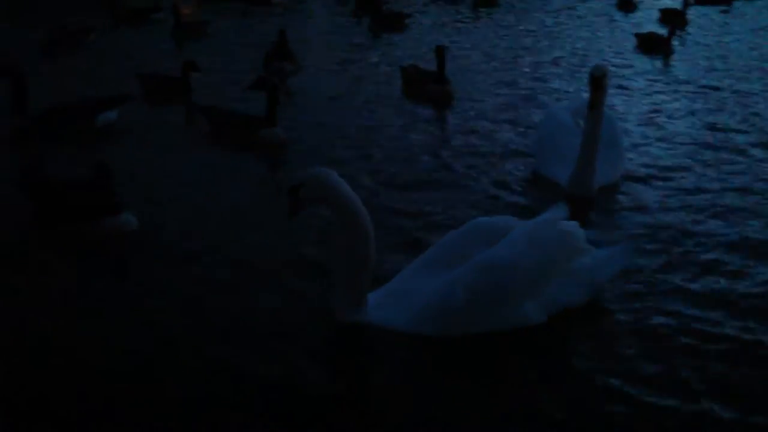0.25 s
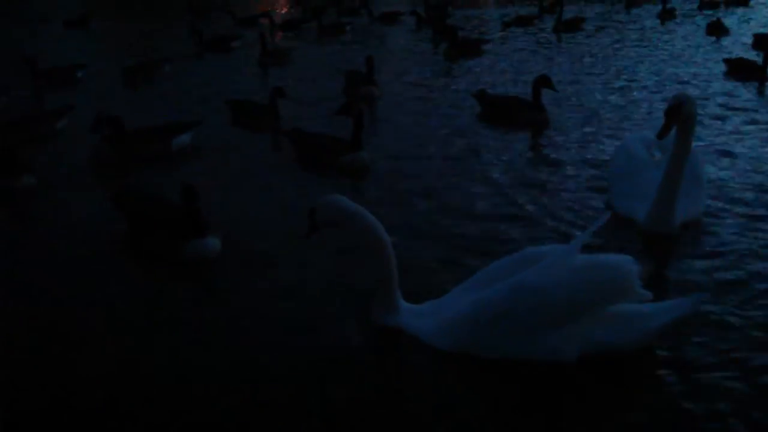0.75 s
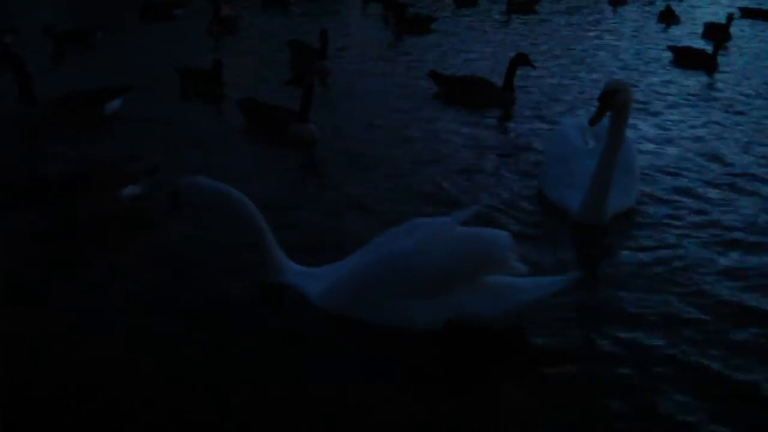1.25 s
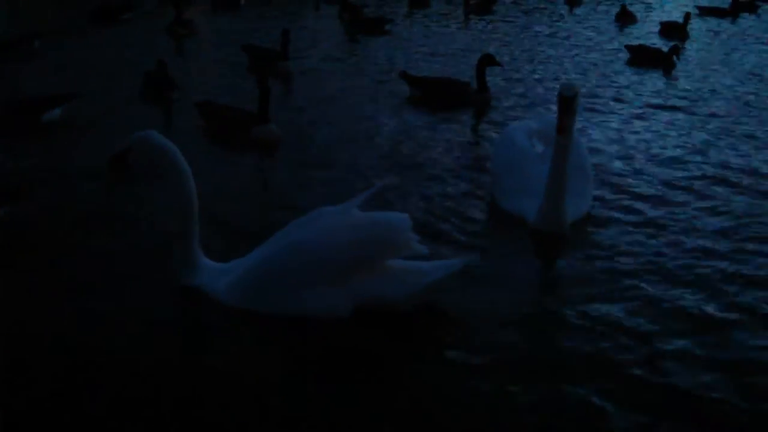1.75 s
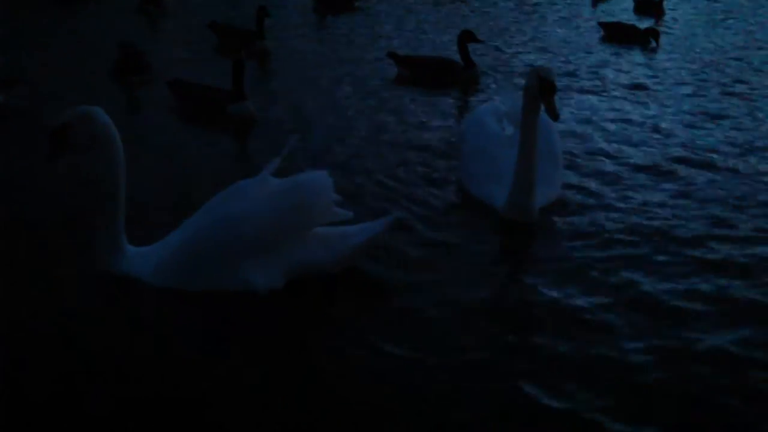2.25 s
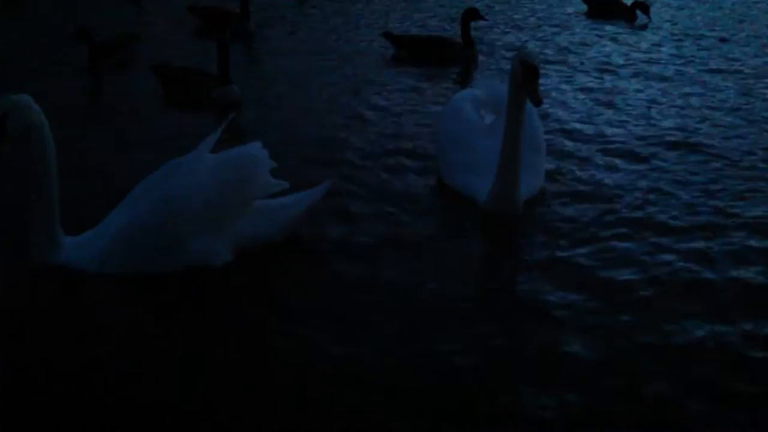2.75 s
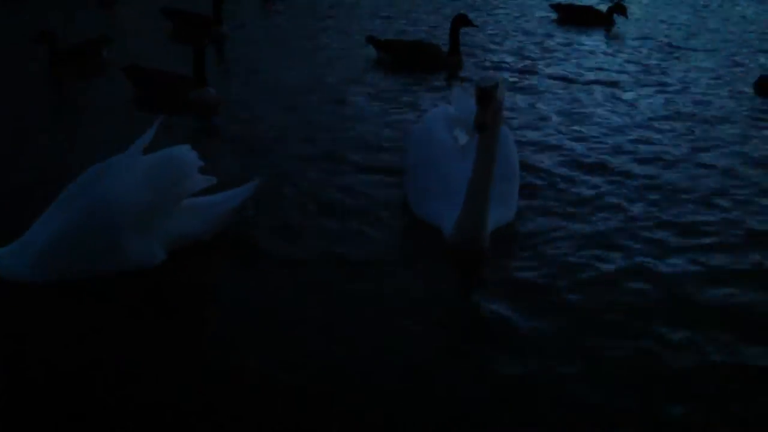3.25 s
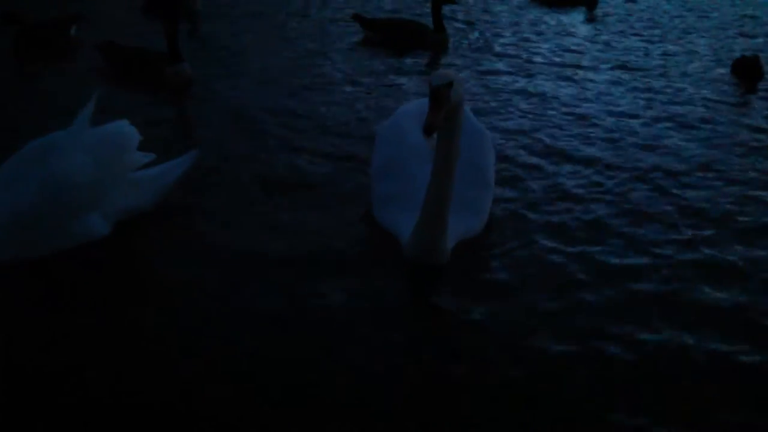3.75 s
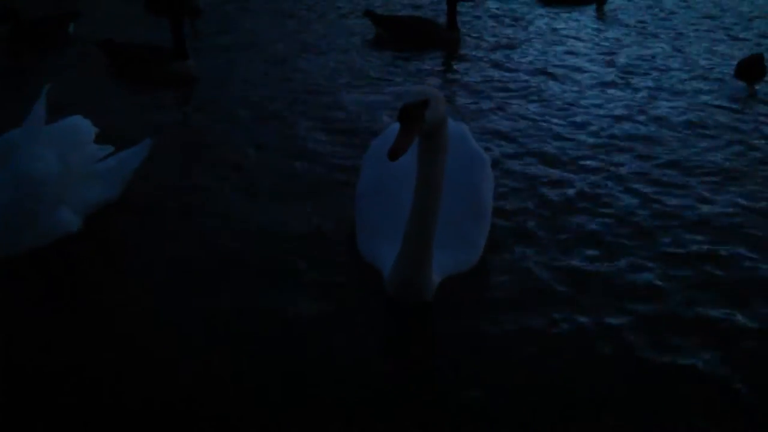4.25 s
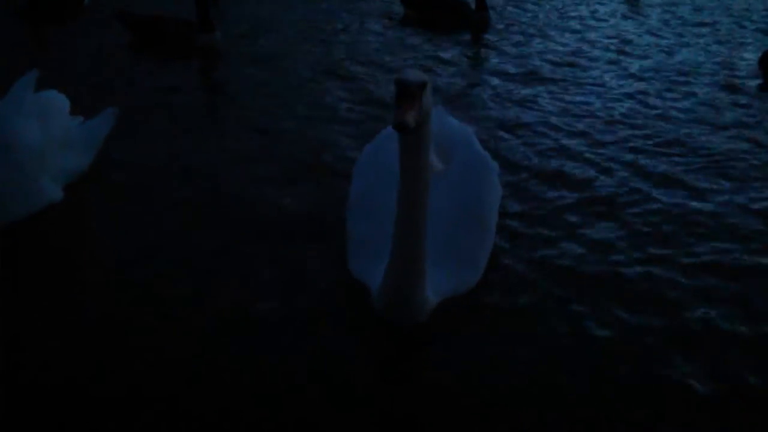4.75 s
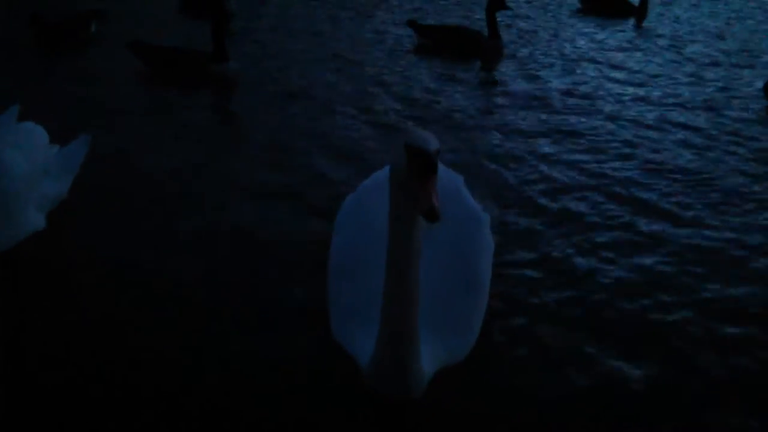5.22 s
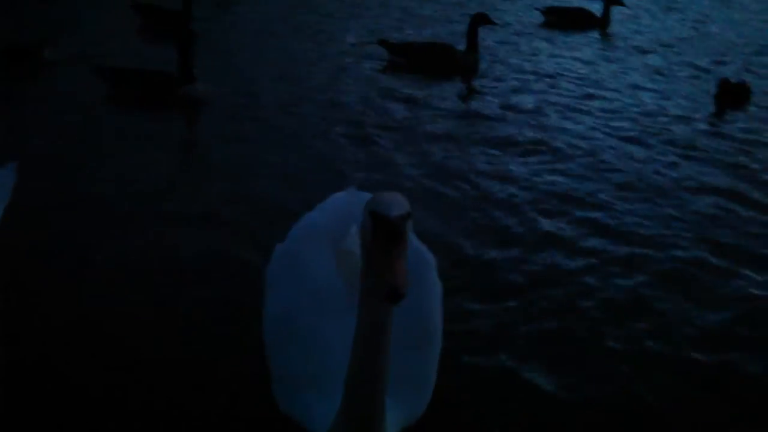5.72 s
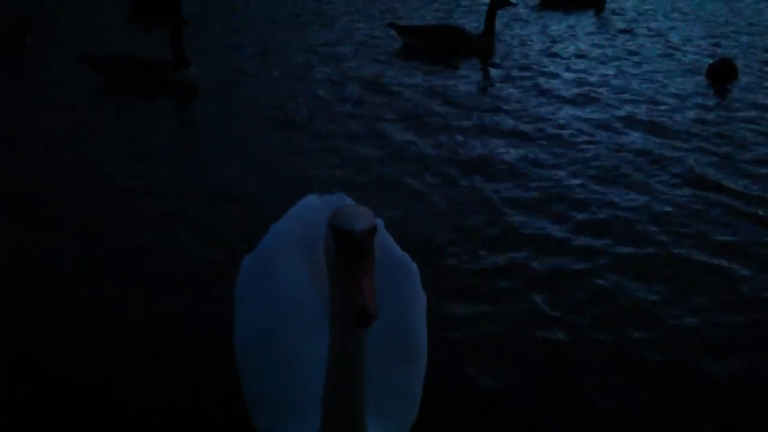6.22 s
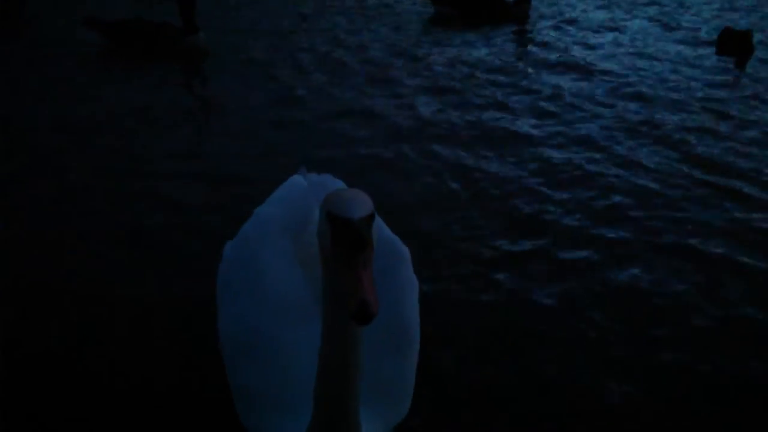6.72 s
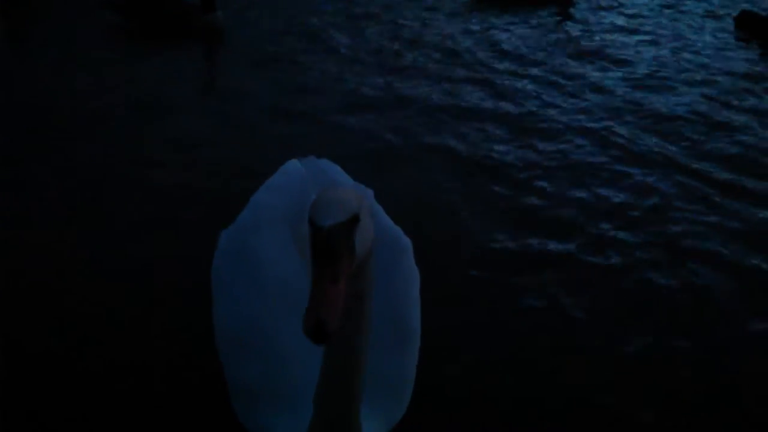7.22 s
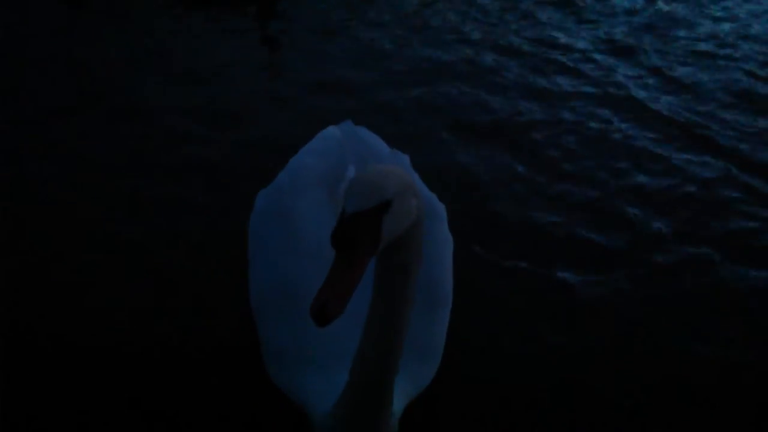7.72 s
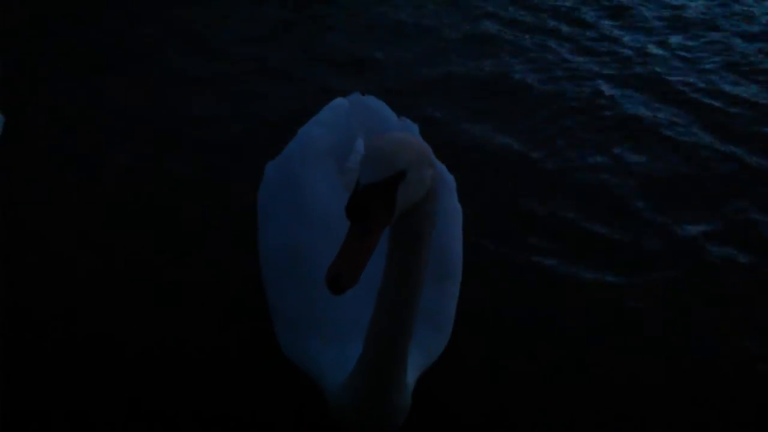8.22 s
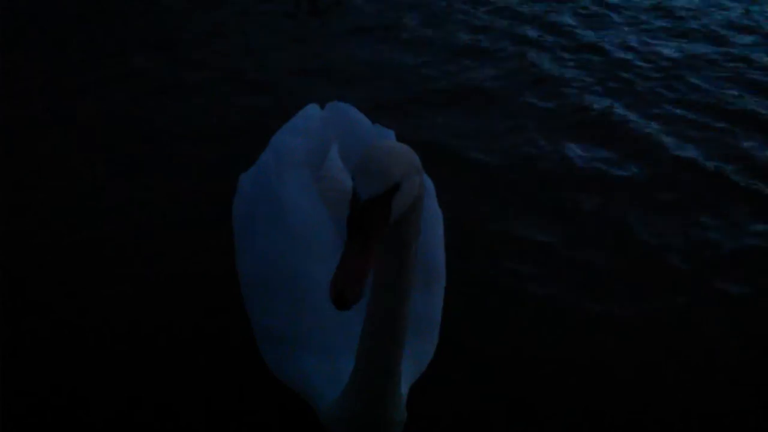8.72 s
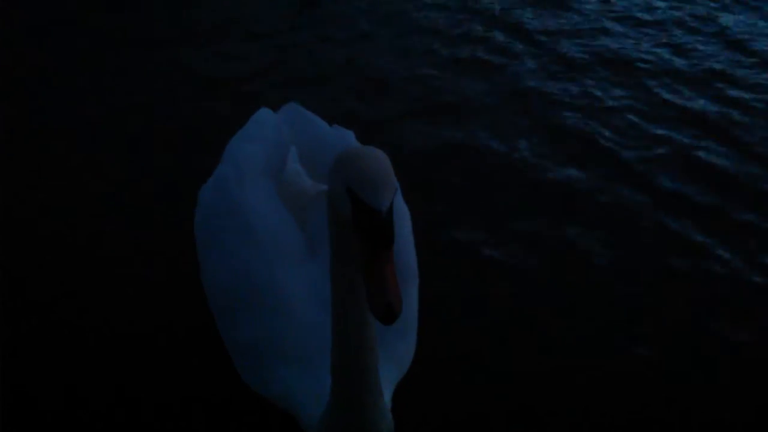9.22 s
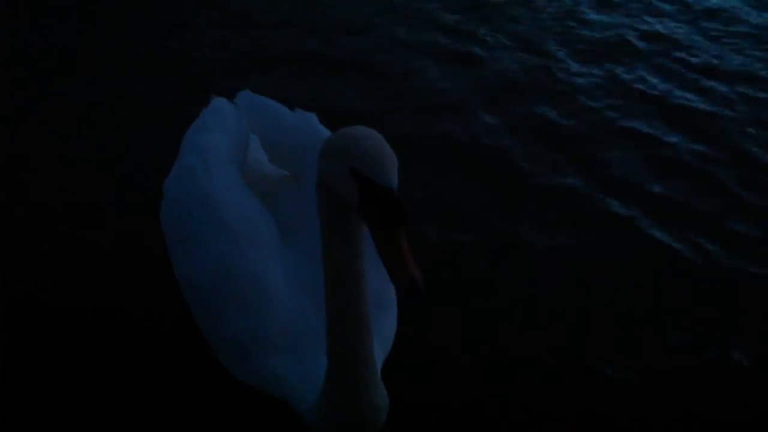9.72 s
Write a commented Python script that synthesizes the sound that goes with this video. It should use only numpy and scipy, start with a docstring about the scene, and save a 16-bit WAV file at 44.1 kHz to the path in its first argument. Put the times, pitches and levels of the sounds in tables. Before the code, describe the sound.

Near geese give creaky, growling honks over a murmuring distant flock on a lake, with paddling, splashes, bill claps and low wind rumble.

```python
"""Geese on a lake at dusk. Near birds honk: a creaky growl breaks into a clear, arched note of whole harmonics.
Farther off a flock murmurs: many short buzzing arches, smeared and half lost in noise, with single calls on top.
Noise bursts paddle, spray and splash, short ticks sound, brief noise contacts ring the bills as claps and a rattle.
Hisses and raspy bursts come and go, a thin wavering sine whistles late; low lumpy noise is wind on the microphone.
Dull echoes return from the banks, bright ones from a hard wall."""
import sys
import numpy as np
from scipy import signal
from scipy.fft import rfft, irfft, next_fast_len
from scipy.io import wavfile
from scipy.ndimage import uniform_filter1d

SR = 44100
rng = np.random.default_rng(int(sys.argv[2]) if len(sys.argv) > 2 else 0)


def int16_out(signal):
    """Quantize to a 16-bit WAV file."""
    q = np.round(np.clip(np.atleast_2d(signal).T, -1, 1) * 32767)
    wavfile.write(sys.argv[1], SR, q.astype(np.int16))


N = 439677


def amp(db):
    """Decibels to gain."""
    return 10 ** (np.asarray(db) / 20)


def rms_one(x):
    """Scale to unit rms."""
    return x / np.sqrt(np.mean(x ** 2) + 1e-20)


def in_time(rows):
    """Columns of a curve, sample by sample."""
    s, *columns = np.transpose(rows)
    return [np.interp(np.arange(N) / SR, s, c) for c in columns]


def span(rows, fade):
    """Sample range of a short curve, a gate with soft ends, and the curve's columns."""
    s, *columns = np.transpose(rows)
    at = np.arange(round((s[0] - fade) * SR), round((s[-1] + fade) * SR))
    t = at / SR
    gate = np.clip(np.minimum(t - t[0], t[-1] - t) / (2 * fade), 0, 1) ** 2
    return at, gate, [np.interp(t, s, c) for c in columns]


def swells(events, rise):
    """Gains of events that rise to a peak and fade; rise is a share of the 20 dB fade time."""
    t, out = np.arange(0, N + 64, 64) / SR, 0
    for s, fade, *levels_db in events:
        away = np.maximum(t - s, (s - t) / rise) / fade
        out = out + amp(np.array(levels_db)[:, None] - 20 * away)
    return [np.interp(np.arange(N) / SR, t, row) for row in out]   # one per level column


def at_hz(points, hz):
    """Read a spectrum on a log-frequency axis, -90 dB outside it."""
    points_hz, points_db = np.array(points).T
    return np.interp(np.log(hz), np.log(points_hz), points_db, left=-90, right=-90)


def drift(rate):
    """Slow chance, spread 1: noise through two equal low-pass stages."""
    r = np.exp(-2 * np.pi * rate / SR)
    return rms_one(signal.lfilter([1], [1, -2 * r, r * r], rng.standard_normal(N + SR))[SR:])


def coloured(x, spectrum, patchy_db=0, rate=10):
    """Give a white signal this spectrum, each third of an octave swelling by itself if patchy; rms 1."""
    size = next_fast_len(N)
    hz = np.maximum(np.arange(size // 2 + 1) * SR / size, 1)
    shaped = rfft(x, size) * amp(at_hz(spectrum, hz))
    if not patchy_db:
        return rms_one(irfft(shaped, size)[:N])
    low, high = (int(3 * np.log2(spectrum[k][0])) for k in (1, -2))
    place = np.clip(3 * np.log2(hz), low, high)   # in thirds of an octave
    out = np.zeros(N)
    for k in range(low, high + 1):
        band = irfft(shaped * np.clip(1 - abs(place - k), 0, 1), size)[:N]
        out += band * amp(patchy_db * drift(rate))
    return rms_one(out)


def resonate(x, modes):
    """Parallel resonances with alternating signs."""
    out = 0
    for k, (hz, width, level_db) in enumerate(modes):
        r = np.exp(-np.pi * width / SR)
        b = (1 - r * r) / 2 * np.array([1, 0, -1])
        a = [1, -2 * r * np.cos(2 * np.pi * hz / SR), r * r]
        out = out + (-1) ** k * amp(level_db) * signal.lfilter(b, a, x + 1e-18)
    return out


def grains(per_s, spread_db):
    """Random clicks of uneven size."""
    sizes = amp(spread_db * np.minimum(rng.exponential(1, N), 5)) * rng.standard_normal(N)
    return sizes * (rng.random(N) < per_s / SR)


def water(spectrum, per_s, patchy_db):
    """Dense small bursts on a wash of noise, coming in patches."""
    wash = rng.standard_normal(N) + .8 * rms_one(grains(per_s, spread_db=2.5))
    return coloured(wash * amp(1.5 * drift(25)), spectrum, patchy_db, rate=12)


# spectra of the wind's low rumble and of its higher buffeting: (frequency [Hz], density [dB per Hz])
RUMBLE = [(8.8, -55), (15, -9.5), (48, 3.5), (119, 3), (146, 0), (200, -7), (260, -34), (440, -120)]
BUFFET = [(59, -30.5), (100, -5.5), (150, 2), (260, 0), (385, -3), (634, -9.5), (953, -24.5), (1170, -31.5),
          (1500, -39), (1950, -63), (3300, -120)]
# gusts at the microphone, before the lumps:
# (strongest time [s], time to fade 20 dB [s], rumble level [dB], buffeting level [dB])
GUSTS = [(.025, .05, -23, -20.5), (.06, .1, -38, -22), (.125, .1, -32, -10), (.175, .05, -32, -11),
         (.28, 0.0933, -26.5, -29), (.5, .04, -33, -41), (1.5, 0.08, -47, -28), (1.58, 0.15, -35, -45),
         (1.77, 0.0346, -38, -25.5), (1.83, 0.15, -25.5, -42), (1.91, 0.08, -34.5, -37),
         (2.135, 0.12, -26, -26), (2.36, 0.09, -37, -38.5), (2.52, 0.02, -34, -37), (2.69, 0.04, -44, -29),
         (3.0, 0.12, -27, -47), (3.16, 0.26, -45.5, -67), (4.19, 0.09, -39.5, -63), (4.33, 0.06, -43, -61),
         (4.41, 0.27, -39.5, -63.5), (5.33, .08, -41, -67), (5.47, 0.05, -43.5, -54.5),
         (6.19, .2, -45, -58), (6.33, 0.17, -45, -63), (6.44, 0.11, -44, -54), (6.53, 0.13, -48.5, -49.5),
         (7.13, 0.1, -54, -45), (7.39, 0.02, -56, -58), (9.55, 0.15, -55, -67), (9.95, .1, -51, -66)]
# rumble between gusts, before the lumps: (time [s], level [dB])
BREEZE = [(0, -44), (.45, -47), (.6, -56.5), (1.4, -56.5), (2.05, -44.5), (2.65, -54.5), (3.4, -59.5),
          (3.9, -48), (4.3, -58), (5.6, -66), (7.3, -59), (7.55, -63), (9.97, -60)]


def wind():
    """Eddies on the microphone port: lumpy low noise, brighter in the gusts."""
    rumble_gain, buffet_gain = swells(GUSTS, rise=0.47)
    rumble_gain = rumble_gain + amp(in_time(BREEZE)[0])
    buffet_gain = buffet_gain + amp(-65)   # calm air
    rumble = coloured(rng.standard_normal(N), RUMBLE) * amp(3.5 * drift(15))
    buffet = coloured(rng.standard_normal(N), BUFFET) * amp(2.6 * drift(23))
    return rumble * rumble_gain + buffet * buffet_gain


# spectrum of the far flock: (frequency [Hz], density [dB per Hz])
FLOCK = [(180, -49.5), (300, -22), (638, -4), (799, 2), (1190, 0), (1460, -8.5), (1700, -20.5), (2210, -48),
         (3740, -120)]
# the far flock, between the near honks: (time [s], level [dB])
FLOCK_LEVEL = [(0, -44), (.3, -48), (.45, -42.5), (.68, -52.5), (.8, -38.5), (1.12, -40), (1.24, -49),
               (1.4, -44), (1.66, -37), (1.92, -61.5), (2.16, -58.5), (2.34, -37), (2.45, -52.5),
               (2.82, -39.5), (3.3, -45), (3.45, -50.5), (3.88, -40), (4.1, -45), (4.43, -39), (4.72, -44),
               (4.9, -48), (5.05, -51.5), (5.55, -48.5), (5.82, -54), (6.2, -51), (6.37, -41),
               (6.46, -49.5), (6.67, -37.5), (7.05, -46), (7.15, -38.5), (7.56, -49.5), (7.71, -39),
               (7.84, -52), (8.02, -37), (8.25, -44.5), (8.52, -53), (8.84, -48.5), (9.3, -49), (9.5, -53),
               (9.7, -49), (9.97, -54.5)]


def far_flock(flock_db, smear_s, blur_db):
    """Many distant calls overlap; each is a short arch, smeared by scattering and half lost in noise."""
    voices = np.zeros(N)
    for when, pitch, length, loud in rng.random((300, 4)):
        t = np.linspace(-1, 1, int((.04 + 0.048 * length) * SR))
        phase = np.cumsum((400 + 380 * pitch) * (1 - .08 * (t + 0.22) ** 2)) / SR
        at = int(when * (N - len(t)))
        buzz = sum(np.cos(2 * np.pi * k * phase) for k in range(1, 4))
        voices[at:at + len(t)] += amp(9 * loud) * (1 - t ** 2) * buzz
    tail_s = np.arange(SR // 4) / SR
    tail = rng.standard_normal(SR // 4) * np.exp(-tail_s / smear_s)
    voices = rms_one(signal.fftconvolve(voices, tail)[:N])
    evened = voices / np.sqrt(uniform_filter1d(voices ** 2, size=9000) + 0.039)
    murmur = evened + amp(blur_db) * rng.standard_normal(N)
    return amp(flock_db) * coloured(murmur, FLOCK, patchy_db=3.5, rate=12)


# spectrum of the hiss: (frequency [Hz], density [dB per Hz])
HISS = [(760, -29), (1300, -6), (2030, -0.5), (2370, -8.5), (2890, -17.5), (3400, -23), (4420, -53),
        (7480, -120)]
# hisses that come and go: (loudest time [s], time to fade 20 dB [s], level [dB])
HISSES = [(.05, 0.4, -54), (.44, .1, -51), (1.124, 0.13, -49.5), (1.66, 0.27, -57.5), (2.85, 0.13, -55),
          (3.2, 0.4, -48.5), (3.43, 0.34, -56), (4.72, 0.29, -36), (6.37, 0.5, -53), (6.67, 0.23, -41),
          (7.05, .15, -53), (7.21, 0.17, -43), (7.71, 0.22, -50.5), (8.045, .25, -52.5), (9.48, 0.53, -61),
          (9.744, 0.46, -53.5)]


def hiss(flock_db):
    """Patchy noise: a steady share rides 19.5 dB under the flock, single hisses swell over it."""
    gain = amp(flock_db - 19.5) + swells(HISSES, rise=0.62)[0]
    return gain * coloured(rng.standard_normal(N), HISS, patchy_db=5.5, rate=8)


# spectrum of the paddling: (frequency [Hz], density [dB per Hz])
PADDLING = [(1760, -39), (3000, -10.5), (3640, -2), (4000, 2), (4350, 7), (4900, 4), (5800, 2),
            (6840, -5.5), (7400, -21), (8000, -18), (10400, -41.5), (17600, -120)]
# the paddling: (time [s], level [dB])
PADDLING_LEVEL = [(0, -72), (.25, -68.5), (.55, -78), (.75, -76), (1.12, -51), (1.39, -68), (1.64, -59),
                  (1.9, -81), (2.4, -83), (2.62, -49.5), (2.8, -43.5), (2.9, -54.5), (3.18, -49.5),
                  (3.31, -44.5), (3.45, -58), (3.68, -56), (3.76, -38.5), (3.86, -50), (3.94, -39.5),
                  (4.02, -51), (4.19, -51), (4.33, -64.5), (4.66, -39), (4.87, -61.5), (5.05, -52),
                  (5.2, -62), (5.5, -56.5), (6.05, -64), (6.35, -49), (6.67, -46.5), (7.0, -52), (7.2, -44),
                  (7.58, -61.5), (7.71, -51.5), (7.84, -62), (8.05, -47.5), (8.36, -64.5), (8.9, -68),
                  (9.3, -62), (9.74, -67), (9.97, -61.5)]


def paddling(paddling_db):
    """Paddled water: dense bursts and wash that follow the paddling level."""
    return amp(paddling_db) * water(PADDLING, per_s=900, patchy_db=3.5)


# spectrum of the spray: (frequency [Hz], density [dB per Hz])
SPRAY = [(4120, -34.5), (7000, -4), (8830, -6.5), (10900, -11.5), (12700, -5), (16000, -12.5)]
# spray thrown up: (loudest time [s], time to fade 20 dB [s], level [dB])
SPRAYS = [(1.0, 0.6, -71), (1.64, 0.26, -54), (2.78, 0.21, -39), (3.07, 0.22, -56.5), (3.345, .12, -48),
          (3.772, 0.14, -40), (3.92, 0.05, -50), (4.68, 0.11, -43), (5.48, 0.25, -66), (6.25, 0.33, -61),
          (6.6, .4, -60), (6.84, .3, -60), (7.12, .08, -40), (7.47, 0.05, -57)]
STEADY_SPRAY_DB, SPRAY_FOLLOWS = -76.5, .3   # mean level; share of the paddling's swing in dB


def spray(paddling_db):
    """Fine, sparser bursts: a faint steady spray follows the paddling, thrown spray swells over it."""
    steady_db = STEADY_SPRAY_DB + SPRAY_FOLLOWS * (paddling_db - paddling_db.mean())
    gain = amp(steady_db) + swells(SPRAYS, rise=0.32)[0]
    return gain * water(SPRAY, per_s=260, patchy_db=0.5)


# short ticks: (time [s], level of the ring at its start [dB], pitch [Hz])
TICKS = [(0.1255, -30, 5280), (0.1726, -38.5, 4800), (3.183, -30, 5740), (3.2947, -30, 5000),
         (3.796, -22.5, 4830), (5.233, -37.5, 5190), (5.972, -37, 6380), (6.471, -29.5, 6100),
         (6.5535, -19.5, 5750), (6.7346, -32, 5270), (7.113, -16.5, 7200), (7.751, -44, 6500),
         (7.8735, -44, 6500), (7.9753, -42, 6000), (8.0496, -42, 6000)]


def ticks(paddling_db):
    """Short ticks, each a click with a very short ring; more come at random, their level tied to the paddling."""
    out, t = np.zeros(N), np.arange(300) / SR
    scattered = []
    for when, loud, pitch in rng.random((16, 3)):
        s = 9.9 * when
        scattered.append((s, paddling_db[int(s * SR)] + 12 + 6 * loud, 4500 + 2000 * pitch))
    for s, level_db, hz in TICKS + scattered:
        ring = np.sin(2 * np.pi * hz * t) * np.exp(-t / 0.00066)
        click = .5 * rng.standard_normal(300) * np.exp(-t / 0.00013)
        at = round(s * SR)
        out[at:at + 300] += amp(level_db) * (ring + click)
    return out


# near honks: (start of the clear note [s], its length [s], highest pitch [Hz], scoop up to it [Hz], level [dB],
#   against the harmonics from the second to 3.9 kHz: fundamental [dB], 3.9-7 kHz [dB], above 7 kHz [dB],
#   growl before it: length [s], end level [dB], against that: bill [dB], rasp [dB])
HONKS = [(0.298, 0.075, 727, 40, -28.5, -5, -29, -42, .016, -29, -35, -60),
         (0.945, 0.1, 691, 31, -21.5, 3, -23.5, -42, 0.031, -23.5, -31.5, -41),
         (1.524, 0.1, 698, 30, -15, -4, -12.5, 0.5, .16, -15.5, -17.5, -11),
         (2.22, 0.081, 737, 15, -26.5, 11, -37, -22, 0.057, -24.5, -50, -53),
         (2.885, 0.079, 651, 3.7, -25, -8, -24, -45, .04, -26, -36, -38),
         (2.98, 0.074, 738, 74, -21.5, -14.5, -20, -17, 0.037, -21, -24.5, -36),
         (3.929, 0.075, 428, -6, -32, 0, -24, -34, 0.016, -37, -40, -60),
         (4.483, 0.09, 687, 16, -20, -3.5, -16, -37, 0.049, -23, -16, -37),
         (4.955, 0.081, 720, 37.4, -21, -16.5, -23, -38, .04, -25.5, -33, -45),
         (7.364, 0.098, 698.5, 14, -14.5, -4.5, 0.5, -5, .19, -15, 2.5, -12.5),
         (7.925, 0.078, 760, 8.1, -24.5, -16, -35, -57, 0.077, -20.5, -48, -63),
         (8.085, 0.071, 731, 50, -20, -14, -25, -47, 0.042, -24.5, -38, -50)]
# resonances that each creak rings, by region, passed twice: (frequency [Hz], width [Hz], level [dB])
CHEST = [(674, 250, -3), (1250, 400, 2), (2000, 400, -11.5)]
BILL = [(3600, 750, -6.5), (5080, 820, -1.5), (6000, 1500, -2)]
RASP = [(8500, 1700, 3), (10500, 1700, -0.5), (14000, 3000, -3)]
CREAKS_PER_S = 165   # on average
OVERLAP_S = .011   # the growl runs on into the note
# going back from the note the growl holds, steps down, then thins out steadily; its treble starts later
GROWL_HOLD_S, STEP_S, STEP_DB, THIN_DB_PER_S, DULL_START_DB = 0.0062, 0.025, 12.5, 65.5, 18.5


def growls(rough, burst, blur):
    """Slack membranes slap unevenly, swelling into the honk; each slap is a click plus a short puff of air."""
    out = np.zeros(N)
    for start, *_, length, end_db, bill_db, rasp_db in HONKS:
        time_to_note = [(start - length, length), (start, 0), (start + OVERLAP_S, 0)]
        at, gate, (ahead,) = span(time_to_note, fade=0.0055)
        step_db = STEP_DB * np.clip((ahead - GROWL_HOLD_S) / STEP_S, 0, 1)
        level_db = end_db - step_db - THIN_DB_PER_S * ahead
        dull_db = DULL_START_DB * (ahead / length) ** 2
        draw = rng.standard_normal((4, len(at)))
        uneven = rms_one(uniform_filter1d(draw[0], size=300))
        cycle = np.cumsum(CREAKS_PER_S * amp(.8 * uneven)) / SR
        slaps = np.diff(np.floor(cycle), prepend=0) * amp(0.7 * draw[1])
        puff = rough * draw[2] * np.exp(-(cycle % 1) / burst)
        far = blur * np.clip(-bill_db / 30, 0, 1) ** 2   # a dull bird is far off: its slaps smear
        source = slaps + puff + far * draw[3]
        regions = [(CHEST, -.4 * dull_db), (BILL, bill_db - dull_db), (RASP, rasp_db - 1.6 * dull_db)]
        for modes, relative_db in regions:
            rung = resonate(resonate(source, modes), modes)
            out[at] += gate * amp(level_db + relative_db) * rms_one(rung)
    return out


# harmonic strengths after windpipe and bill, within each region of the spectrum: (frequency [Hz], level [dB])
WINDPIPE = [(400, -4), (700, 2), (1400, 1.5), (2100, -14.5), (2800, -34), (3500, -37), (4200, -24.5),
            (4900, -15.5), (5600, -13.5), (6900, -34), (8500, -13.5), (11000, -24.5), (12500, -40),
            (16000, -46.5)]
CREST, SAG, SAG_BEND = .42, .14, 2.4   # where the pitch peaks, how far it then falls (shares), how late
HOLD, RELEASE_DB = .55, 14   # the level holds for this share of the note, then sinks ever faster
TREBLE_LATE_S = 0.02   # the upper harmonics clear up this long after the start


def honks(strain, breath):
    """A steady membrane tone: whole multiples of the pitch, weighted by windpipe and bill.
    Returns the sound and the share of it that reaches the wall."""
    out, waver, k = np.zeros((2, N)), drift(90), np.arange(1, 40)[:, None]
    for start, length, top_hz, scoop_hz, note_db, first_db, mid_db, top_db, *_ in HONKS:
        at = round(start * SR) + np.arange(round(length * SR))
        u = np.linspace(0, 1, len(at))
        before, after = np.clip(1 - u / CREST, 0, 1), np.clip((u - CREST) / (1 - CREST), 0, 1)
        arch = top_hz * (1 - SAG * after ** SAG_BEND) - scoop_hz * before ** 2
        pitch = arch * (1 + 0.001 * waver[at])
        level_db = note_db - RELEASE_DB * np.clip((u - HOLD) / (1 - HOLD), 0, 1) ** 2
        # the treble needs full effort
        late_db = 20 * np.clip(1 - u * length / TREBLE_LATE_S, 0, 1)
        fade_db = strain * (level_db - note_db) - late_db
        # 0 fundamental, 1 up to 3.9 kHz, 2 up to 7 kHz, 3 above
        region = np.where(k == 1, 0, np.digitize(k * pitch.mean(), [3900, 7000]) + 1)[:, 0]
        strengths = amp(at_hz(WINDPIPE, k * pitch))
        # the note frays at both ends, most in the treble
        hoarse = breath * (1 + 5.1 * (2 * u - 1) ** 6) * np.sqrt(k)
        chance = uniform_filter1d(rng.standard_normal(strengths.shape), size=60)
        flutter = 1 + hoarse * uniform_filter1d(chance, size=40) * np.sqrt(60)
        tones = strengths * flutter * np.cos(k * 2 * np.pi * np.cumsum(pitch) / SR + .35 * k ** 2)
        relative = amp(np.broadcast_arrays(first_db, 0, mid_db + fade_db, top_db + fade_db))
        voice = 0
        for r in range(4):
            power = np.sum(strengths[region == r] ** 2, axis=0) / 2 + 1e-12
            voice = voice + relative[r] * tones[region == r].sum(axis=0) / np.sqrt(power)
        voice = voice / np.sqrt(1 + amp(2 * first_db))
        gate = np.clip(np.minimum(u / 0.009, (1 - u) / 0.016) * length, 0, 1)
        # a dull bird faces away, towards the wall
        turned = np.clip(-(mid_db + 12) / 8, 0, 1) * (top_db < -12)
        out[:, at] += np.outer([1, turned], gate * amp(level_db) * voice)
    return out


# echoes, dull off the banks and bright off a hard wall: (delay [s], level [dB])
ECHOES = [(.021, -23.5), (.047, -25.5), (.083, -37), (.131, -53)]
WALL = [(.05, -12), (.068, -22), (.09, -11)]


def banks(x, turned):
    """Delayed copies: a few dull echoes, and bright ones of the birds that face the wall."""
    dull = signal.sosfilt(signal.butter(2, 2500, fs=SR, output="sos"), x)
    bright = signal.sosfilt(signal.butter(2, [4000, 6500], "band", fs=SR, output="sos"), turned)
    out = np.zeros(N)
    for y, echoes in [(dull, ECHOES), (bright, WALL)]:
        for delay, level_db in echoes:
            out += amp(level_db) * np.pad(y, (round(delay * SR), 0))[:N]
    return out


# distant calls of which one partial stands out, before bend and waver:
# (start [s], length [s], pitch at start [Hz], pitch at end [Hz], peak level [dB])
FAR_CALLS = [(0.434, 0.059, 910, 837, -39), (0.63, 0.06, 2150, 1850, -56), (0.818, 0.05, 590, 557.0, -40),
             (.85, .045, 2050, 1950, -50), (0.842, 0.064, 893, 955.0, -40), (1.072, 0.15, 908, 980, -47),
             (1.168, 0.078, 806, 805, -41.5), (1.3, 0.2, 702, 793, -39), (3.157, 0.047, 1495.0, 1460, -40),
             (3.168, 0.065, 776, 630, -40), (3.318, 0.069, 840, 920, -41.5),
             (3.367, 0.058, 700, 719.0, -41), (3.785, 0.04, 3600, 3667.0, -43),
             (4.197, 0.034, 568, 585, -42), (5.217, 0.055, 1500, 1430, -43.5),
             (5.913, 0.045, 1460, 1500, -51.5), (7.124, 0.022, 546, 530, -32), (7.6, .045, 2400, 2300, -55),
             (7.798, 0.04, 707.0, 697.0, -48.5), (8.224, 0.036, 560, 525, -42),
             (8.87, .13, 2620, 2600, -71), (9.215, 0.042, 2080, 2050, -55.5),
             (9.431, 0.086, 1480, 1436, -49.5), (9.613, 0.064, 1380, 1274, -51.5)]


def far_calls(arch, hoarse):
    """Single faint sine notes that bend in pitch and waver in level."""
    out, waver = np.zeros(N), 1 + hoarse * drift(59)
    for start, length, from_hz, to_hz, peak_db in FAR_CALLS:
        u = np.linspace(0, 1, round(length * SR))
        bend_hz = arch * from_hz * (u * (1 - u) * 4 - .7)
        hz = from_hz + (to_hz - from_hz) * u + bend_hz
        at = round(start * SR) + np.arange(len(u))
        out[at] += amp(peak_db) * np.sin(np.pi * u) ** 0.29 * np.sin(2 * np.pi * np.cumsum(hz) / SR)
    return out * waver


# short raspy bursts, perhaps wings or wet feathers:
# (start [s], length [s], centre [Hz], rms level at the height of the swell [dB])
RASPS = [(0.615, 0.067, 4350, -57), (0.679, 0.048, 4300, -59), (4.032, 0.098, 4150, -44.5),
         (4.329, 0.095, 4350, -43.5), (5.409, 0.051, 4600, -50), (6.685, 0.041, 4600, -43),
         (6.882, .06, 4270, -41.5), (7.652, 0.049, 3130, -48), (7.71, 0.076, 4550, -49.5),
         (7.964, 0.038, 4870, -46.5), (9.23, 0.038, 5900, -53.5), (9.72, 0.058, 4030, -55),
         (9.772, 0.052, 3600, -48.5), (9.775, 0.039, 5070, -56), (9.896, .07, 3840, -54)]


def rasps(sharpness):
    """Bursts of gritty noise, resonated twice around one pitch."""
    out, grit = np.zeros(N), rng.standard_normal(N) * amp(1.9 * drift(120))
    for start, length, hz, level_db in RASPS:
        at = round(start * SR) + np.arange(round(length * SR))
        mode = [(hz, hz / sharpness, 0)]
        swell = np.sin(np.linspace(0, np.pi, len(at))) ** 0.69
        out[at] += amp(level_db) * swell * rms_one(resonate(resonate(grit[at], mode), mode))
    return out


# two big splashes, levels before the low cut: (low cut [Hz], curve of (time [s], level [dB]))
SPLASHES = [(150, [(2.6, -58), (2.664, -28.5), (2.672, -18), (2.742, -17.5), (2.83, -44.5)]),
            (650, [(4.64, -44), (4.69, -34), (4.78, -40), (4.87, -54)])]
# spectrum of the splashes: (frequency [Hz], density [dB per Hz])
SPLASH_COLOUR = [(150, -67), (250, -18), (342, -7.5), (436, 0), (547, -5), (686, -4), (1020, -4),
                 (1640, -4.5), (3170, -17.5), (10400, -15), (16000, -32)]


def splashes():
    """Thrown water: very dense bursts, gated to each splash with the lows cut."""
    out, thrown = np.zeros(N), water(SPLASH_COLOUR, per_s=1500, patchy_db=2.5)
    for low_hz, rows in SPLASHES:
        at, gate, (splash_db,) = span(rows, fade=0.011)
        low_cut = signal.butter(4, low_hz, "high", fs=SR, output="sos")
        out[at] += gate * amp(splash_db) * signal.sosfilt(low_cut, thrown[at])
    return out


# single bill claps: (time [s], level [dB], edge against body [dB], contact time [s])
CLAPS = [(3.184, -32, -4, .004), (3.781, -28.5, -15, 0.0026), (5.473, -15, -11.5, 0.0029),
         (6.196, -15.5, -17, 0.0041), (6.246, -16, -39, 0.0034), (6.345, -31.5, -22, 0.0019),
         (6.445, -21, -39, 0.0017), (6.516, -32.5, -31, 0.0023), (6.552, -24.5, -31, 0.0024),
         (7.055, -28, 1, 0.0035), (7.186, -30, -20, 0.0023), (9.143, -34, -51, 0.0026),
         (9.161, -33, -49.5, 0.0015), (9.191, -32, -50, 0.0032)]
# resonances of the bill's body and edge, levels relative within each: (frequency [Hz], width [Hz], level [dB])
CLAP_BODY = [(574, 180, 20), (1430, 75, 0.5), (1790, 70, 9)]
CLAP_EDGE = [(2600, 67, -8.5), (4910, 160, 24.5), (8400, 4800, 6), (13300, 4700, 9.5)]


def claps(events, body_modes, edge_modes, low_hz):
    """Each clap is a few milliseconds of rattling contact that rings the bill."""
    out, t = np.zeros(N), np.arange(int(.04 * SR)) / SR
    for s, level_db, bright_db, length in events:
        contact = rng.standard_normal(len(t)) * (t / length) * np.exp(-(t / length) ** 2)
        body = resonate(uniform_filter1d(contact, size=9), body_modes)
        edge = resonate(contact, edge_modes)
        clap = body / np.abs(body).max() * 0.91 + amp(bright_db) * edge / np.abs(edge).max()
        at = round((s - .001) * SR)
        out[at:at + len(t)] += amp(level_db) * clap
    return signal.sosfilt(signal.butter(4, low_hz, "high", fs=SR, output="sos"), out)


# resonances of the rattling bill, levels relative within each: (frequency [Hz], width [Hz], level [dB])
RATTLE_BODY = [(760, 75, -0.5), (1740, 100, -3)]
RATTLE_EDGE = [(2630, 120, -7), (3400, 80, -2), (4055, 75, -5.5), (4930, 400, -10), (9160, 650, -19),
               (11400, 3500, -29)]
RATTLE_S, RATTLE_GAP_S, RATTLE_CONTACT_S = 4.574, .0231, 0.0037
RATTLE_DB, RATTLE_BRIGHT_DB, RATTLE_DULLS_DB = -14.5, 5, 7.5   # level, edge against body, edge lost per late clap


def rattle():
    """A quick bill rattle: five evenly spaced claps that lose their edge after the third."""
    rows = []
    for k in range(5):
        bright_db = RATTLE_BRIGHT_DB - RATTLE_DULLS_DB * max(k - 2, 0)
        rows.append((RATTLE_S + k * RATTLE_GAP_S, RATTLE_DB, bright_db, RATTLE_CONTACT_S))
    return claps(rows, RATTLE_BODY, RATTLE_EDGE, low_hz=560)


# a thin high whistle, 2 dB under its middle level: (time [s], pitch [Hz], level [dB])
WHISTLE = [(7.98, 7070, -75), (8.3, 7120, -71), (8.6, 7180, -78.5)]


def whistle():
    """A faint sine that wavers in level."""
    out = np.zeros(N)
    at, gate, (hz, level_db) = span(WHISTLE, fade=0.018)
    gain = gate * amp(level_db + 2.0 + 3.0 * drift(30)[at])
    out[at] = gain * np.sin(2 * np.pi * np.cumsum(hz) / SR)
    return out


def scene():
    """Near birds with their echoes, then flock, water, small sounds and wind at the microphone."""
    (flock_db,), (paddling_db,) = in_time(FLOCK_LEVEL), in_time(PADDLING_LEVEL)
    clear, turned = honks(strain=1.1, breath=.055)
    near = clear + growls(rough=0.55, burst=0.34, blur=0.22)
    near += claps(CLAPS, CLAP_BODY, CLAP_EDGE, low_hz=150) + rattle()
    lake = far_flock(flock_db, smear_s=.025, blur_db=9.5) + hiss(flock_db)
    lake += paddling(paddling_db) + spray(paddling_db) + splashes()
    small = far_calls(arch=0.06, hoarse=0.75) + rasps(sharpness=5.0) + ticks(paddling_db) + whistle()
    return (near + banks(clear, turned) + lake + small + wind())[None]


CUTOFF_HZ = 16300


def record(dry):
    """At the microphone peaks are rounded and the top is cut."""
    held = dry / (1 + (dry / .74) ** 6) ** (1 / 6)
    return signal.sosfilt(signal.cheby2(20, 90, CUTOFF_HZ, fs=SR, output="sos"), held)


dry = scene()
out = record(dry)
int16_out(out)
```